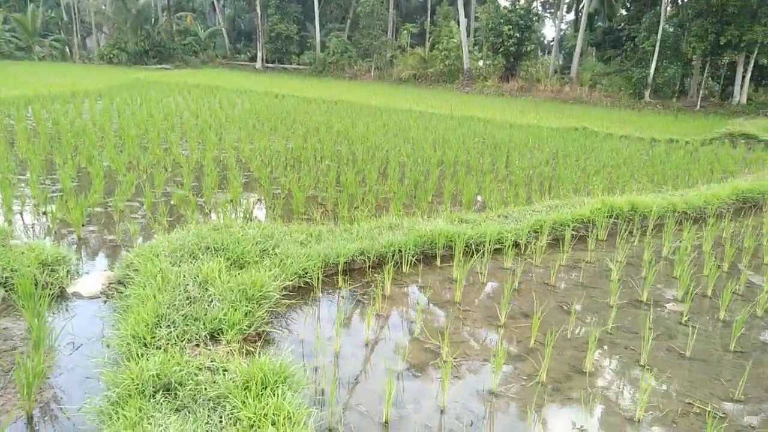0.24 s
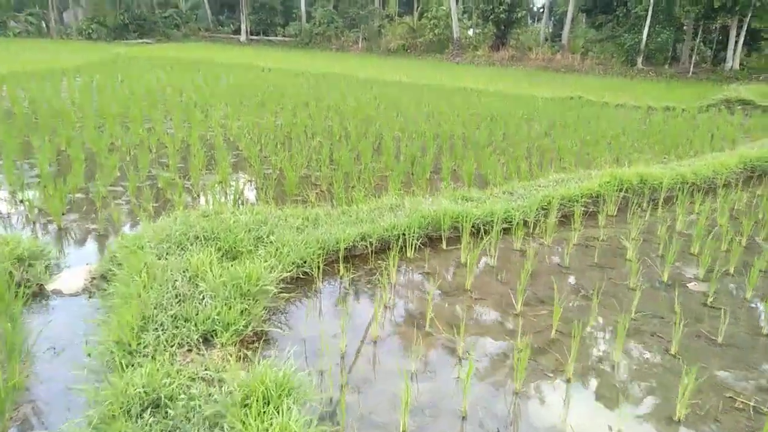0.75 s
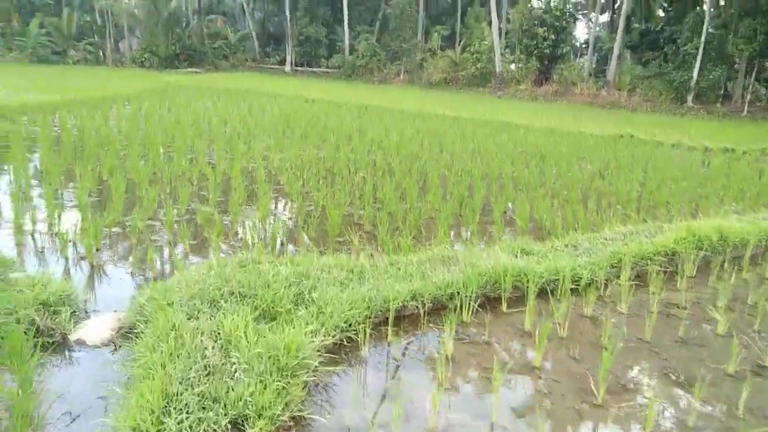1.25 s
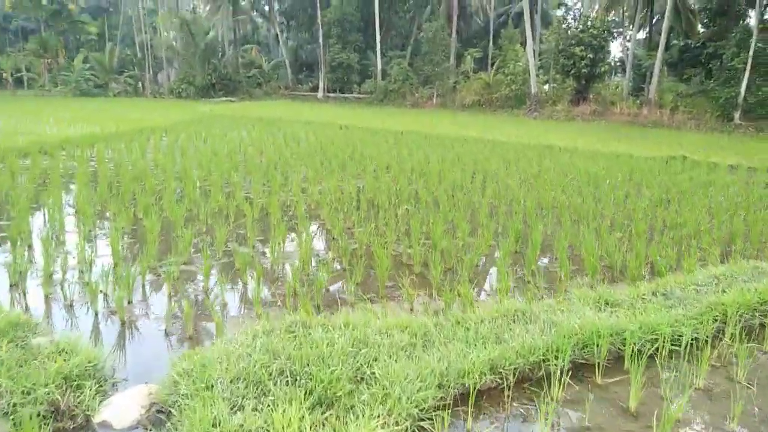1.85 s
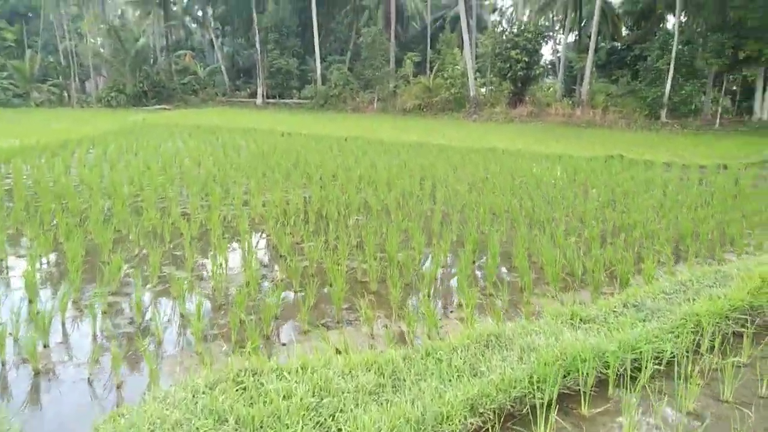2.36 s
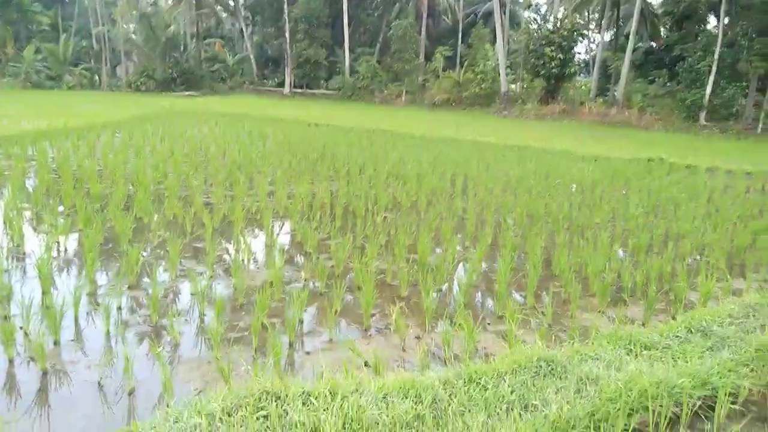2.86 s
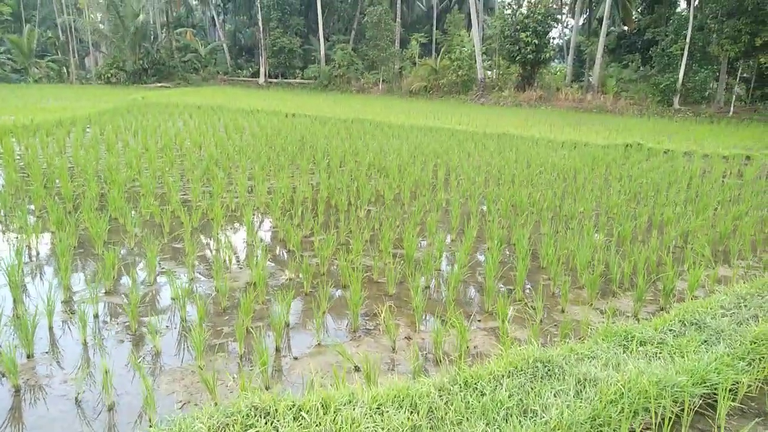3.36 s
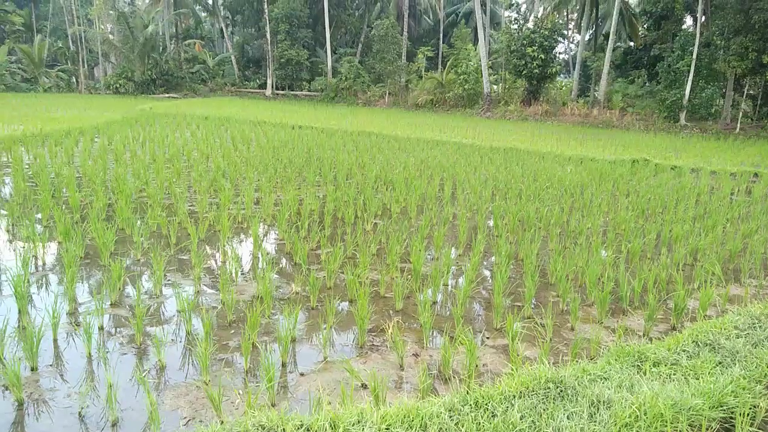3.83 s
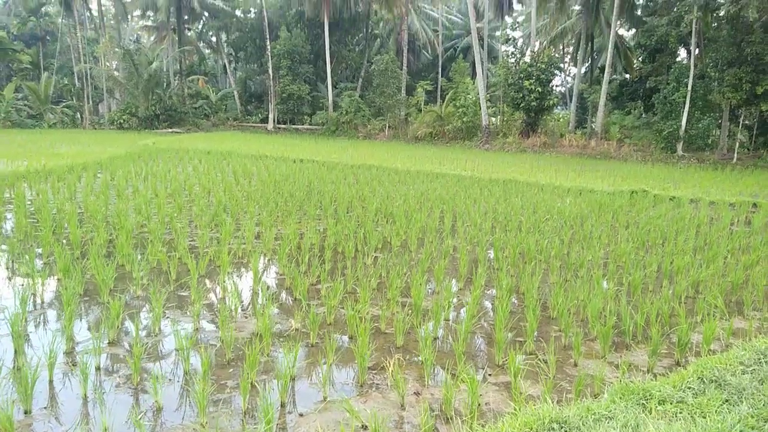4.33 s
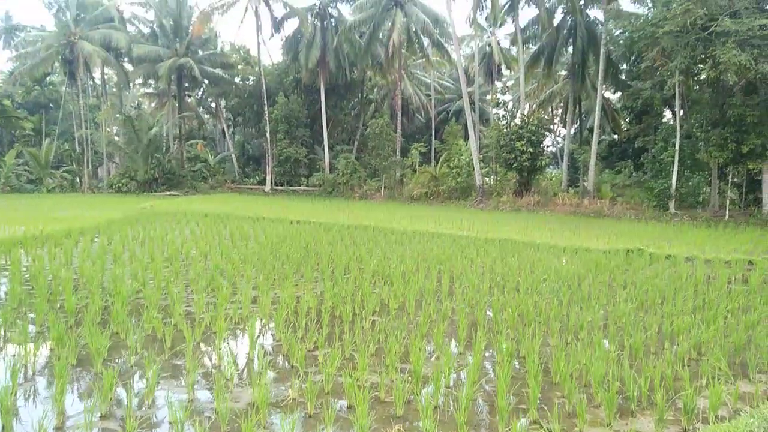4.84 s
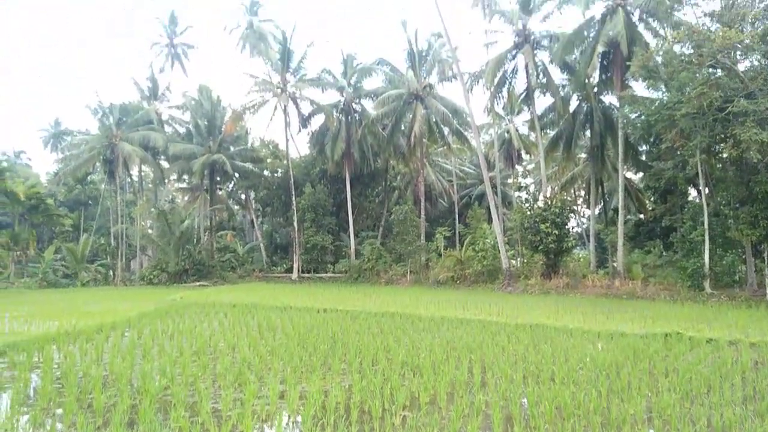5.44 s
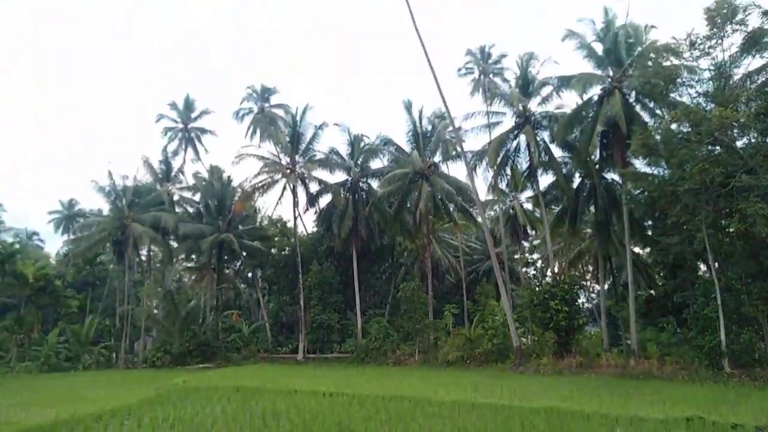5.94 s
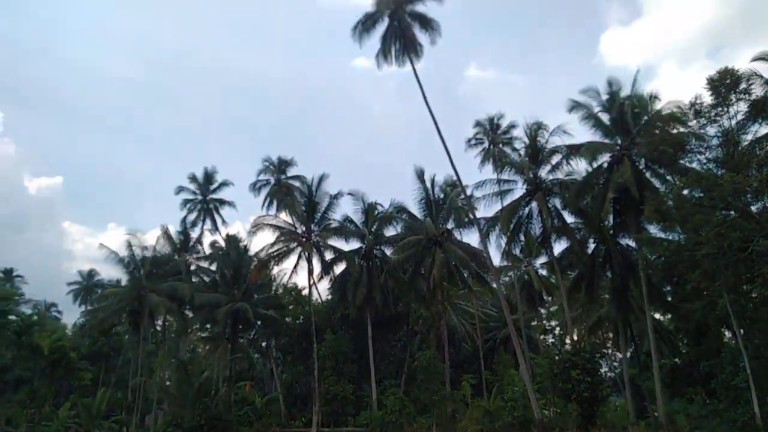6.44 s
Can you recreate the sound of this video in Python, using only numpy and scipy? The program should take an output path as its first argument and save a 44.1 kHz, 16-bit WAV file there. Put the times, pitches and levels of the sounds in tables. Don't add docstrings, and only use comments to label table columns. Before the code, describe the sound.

Handheld outdoor ambience in open wet paddies: airy hiss, lumpy low wind and step thumps on the microphone. Bright whistled peeps drop quickly in pitch, sometimes in overlapping pairs. Early grass strides hiss and crackle, ending with a splash and a cluster of housing knocks near three seconds. Then it is calmer, with a small engine throbbing in swells, far clucks and coos, and a thin insect whine late.

```python
import sys
import numpy as np
from scipy import signal
from scipy.fft import rfft, irfft, next_fast_len
from scipy.io import wavfile
from scipy.ndimage import uniform_filter1d

SR = 44100
rng = np.random.default_rng(int(sys.argv[2]) if len(sys.argv) > 2 else 0)


def wav_out(sig):
    wavfile.write(sys.argv[1], SR, np.round(np.clip(np.atleast_2d(sig).T, -1, 1) * 32767).astype(np.int16))


def how_loud(loudness_db):
    steps = np.asarray(loudness_db, float) / 20
    return 10 ** steps


N = 295029
LEAD = 8192

# frequency in Hz, density in dB per Hz.
AIR_SPECTRUM = [(180, -52), (300, -11.5), (360, -9), (590, -12), (708, -10.5), (1030, -16.5), (1900, -19),
                (2970, -22), (4960, -24), (5940, -24.5), (12100, -26), (15500, -21.5)]
# frequency in Hz, t60 in seconds.
NEAR_T60 = [(500, .35), (3300, .29), (4200, .32), (5000, .33), (7000, .3)]
# frequency in Hz, level in dB.
TREE_LINE_BAND = [(3500, -40), (4700, -20), (4950, 0), (5150, -1), (5450, -20), (7000, -34)]

# time in seconds, pitch in Hz, level in dB.
ROAD_WHINE = [
    (0.0, 363, -61),
    (0.253, 360.6, -64),
    (0.672, 396.6, -73.5),
    (0.92, 386, -81),
]
# start in seconds, length in seconds, level in dB.
INSECT_PHRASES = [(4.87, .06, -83), (4.99, .06, -92), (5.153, 0.26, -88.5), (5.405, 0.034, -82),
                  (5.53, 0.12, -93), (5.698, .06, -83), (5.88, .08, -94.5), (6.034, 0.17, -85),
                  (6.207, .14, -79.5), (6.424, 0.12, -81), (6.557, .11, -85)]
# start in seconds, swell in seconds, level in dB.
INSECT_BED = (4.9, 0.34, -91.5)

# time in seconds, firing rate in Hz.
FIRING_RATE = [(0, 28.5), (1.4, 27), (2, 29), (3, 29.5), (3.5, 28.5), (3.9, 27), (4.8, 27), (5.07, 28.5),
               (5.36, 28.6), (5.45, 29.5), (6.07, 29.6), (6.32, 30.3), (6.43, 28.8), (6.69, 25.9)]
# time in seconds, level in dB,
# order favoured by direct sound plus ground echo.
ENGINE_PATH = [(0.0, -63, 4.0), (.8, -76.5, 4.8), (1.2, -60.5, 4.4), (1.51, -61, 4.45), (2.38, -50, 4.55),
               (2.55, -50.5, 4.25), (2.91, -47.5, 4.75), (3.58, -55, 4.3), (3.9, -48.5, 4.65),
               (4.3, -55, 4.65), (4.78, -58.5, 4.9), (4.95, -49, 5.0), (5.27, -43.5, 5.05),
               (5.66, -52, 5.0), (5.85, -46, 4.2), (6.12, -39.5, 4.9), (6.3, -46, 5.7), (6.47, -39, 4.3),
               (6.69, -46, 4.4)]
# order number, level in dB against its leader.
EXHAUST_ORDERS = [(2, -10.5), (3, -14.5), (7, 1.5), (8, -3.5), (9, -1.5), (10, -4), (11, -21.5),
                  (12, -15.5)]
# time in seconds, rise in seconds, fall in seconds, level in dB.
LOAD_BARKS = [
    (2.55, 0.11, 0.089, -58.5),
    (2.91, 0.056, 0.31, -65),
    (6.12, 0.044, 0.069, -60),
    (6.32, 0.13, 0.081, -57),
    (5.42, 0.069, 0.17, -69),
    (6.69, 0.08, .1, -58),
]

# start in seconds, length in seconds, pitch in Hz, level in dB.
FOWL_NOTES = [(0, 0.064, 817, -70), (.33, 0.13, 731, -64.5), (.52, 0.13, 728, -67), (.385, 0.16, 861, -71),
              (.56, 0.13, 918, -69.5), (.17, 0.029, 968, -72), (.74, 0.038, 1000, -80),
              (.86, 0.049, 879, -69.5), (.934, 0.089, 742, -76), (1.046, 0.064, 928, -76.5),
              (1.15, 0.1, 733, -66), (1.39, .063, 747, -70.5), (1.47, 0.067, 853, -64),
              (1.64, 0.095, 879, -72), (1.87, 0.073, 855.4, -64.5), (1.92, 0.11, 1046, -75.5),
              (2.05, 0.31, 845, -72), (2.4, 0.31, 834, -73.5), (3.23, 0.086, 793, -68),
              (3.46, 0.1, 789, -73), (3.6, 0.34, 773, -66), (3.75, 0.16, 655, -69),
              (4.22, 0.052, 756, -70.5), (4.4, 0.064, 753, -73.5), (4.67, 0.051, 738, -74.5),
              (4.95, 0.031, 884, -67), (5.553, 0.078, 940, -79), (5.69, 0.044, 738, -73)]
# start in seconds, length in seconds, pitch in Hz, level in dB.
DOVE_NOTES = [(.1, 0.076, 607, -80), (1.0, 0.062, 480, -73), (1.7, 0.12, 517, -74),
              (1.38, 0.045, 443, -73.5), (2.18, 0.081, 604, -68), (3.3, 0.33, 565.4, -73.5),
              (4.0, 0.074, 520, -74), (4.28, 0.19, 521, -73), (4.571, 0.059, 435, -68.5),
              (4.59, 0.21, 514, -73), (4.9, 0.065, 509, -76), (5.33, 0.11, 520, -71.5),
              (5.75, 0.11, 505, -66.5)]
# start in seconds, length in seconds, pitch in Hz, level in dB.
CROW_NOTES = [(.36, 0.28, 1456, -70.5), (.68, 0.082, 1424, -73.5), (.88, 0.056, 1614, -68),
              (1.47, 0.115, 1738, -70.5), (1.68, 0.099, 1478, -73), (2.11, 0.042, 1520, -84),
              (2.18, 0.037, 1600, -75), (.02, 0.042, 1620, -82), (.58, 0.17, 1450, -81),
              (.76, .04, 1800, -87), (1.245, 0.03, 2080, -81), (2.16, 0.03, 1200, -81),
              (2.261, 0.044, 1323, -73), (3.0, 0.16, 1584, -71), (3.08, 0.14, 1350, -80.5),
              (3.23, 0.22, 1566, -78), (3.269, 0.036, 1363, -79), (3.595, 0.046, 1407, -69),
              (3.6, 0.41, 1537, -78), (4.09, 0.055, 1520, -78.5)]
# start in seconds, length in seconds, pitch in Hz, level in dB.
SMALL_BIRD_NOTES = [
    (1.845, 0.025, 1210, -68),
    (2.1, 0.05, 2100, -77.5),
    (1.19, .02, 2400, -82),
    (4.742, 0.067, 2800, -77.5),
    (4.77, 0.049, 2450, -73),
    (5.55, 0.13, 2120, -68),
    (6.459, .014, 2640, -73.5),
    (6.195, 0.03, 6750, -83),
]

# frequency in Hz, density in dB per Hz.
RUMBLE_SPECTRUM = [(12, -30.5), (30, 4.5), (70, 3.5), (130, 5.5), (200, -18), (400, -38)]
# frequency in Hz, density in dB per Hz.
FLUTTER_SPECTRUM = [(120, -27), (200, 11.5), (330, 5.5), (500, -32), (1100, -27), (2500, -42)]
# time in seconds, reach in seconds,
# rumble in dB, flutter in dB against it.
GUSTS = [(.18, 0.19, -54, -16), (.61, 0.1, -60.5, -17), (1.3, 0.24, -53.5, -9), (1.541, 0.1, -46, -13.5),
         (1.92, 0.32, -49, -11), (2.118, 0.12, -55, -2), (2.29, 0.15, -47, -12.5),
         (2.532, 0.12, -44.5, -3.5), (2.96, 0.26, -44.5, -6), (3.35, 0.043, -50, -40),
         (3.95, 0.32, -48.5, -20), (4.169, 0.11, -60.5, 11.5), (4.418, 0.058, -54.5, 0),
         (4.571, 0.16, -52, -15), (4.922, 0.062, -45.5, -12.5), (5.27, 0.18, -50, -10.5),
         (6.2, 0.47, -57, -2), (6.69, 0.13, -45.5, -26)]
# time in seconds, peak in dB, pitch
# in Hz, reach in seconds.
PUFFS = [
    (1.272, -38, 79.3, 0.017),
    (1.547, -36, 92.8, 0.024),
    (1.93, -37, 85, 0.029),
    (2.028, -38, 110, 0.031),
    (2.511, -37, 113, .012),
    (2.532, -26.5, 108, 0.0092),
    (2.9383, -31, 266, 0.0018),
]

# time in seconds, peak in dB, ring in Hz, t60 in seconds.
HOUSING_KNOCKS = [
    (2.101, -57, 111, 0.11),
    (2.8135, -39.5, 463, 0.036),
    (2.8243, -24.5, 600, 0.0058),
    (2.9375, -16.5, 285, 0.0092),
    (2.942, -26, 129, 0.032),
    (0.942, -51, 251, 0.1),
    (2.974, -33.5, 148, 0.05),
]
# time in seconds, level in dB.
HAND_SCRAPE = [
    (2.805, -84),
    (2.828, -52.5),
    (2.87, -53.5),
    (2.92, -64.5),
    (2.95, -54),
    (3.04, -58),
    (3.1, -89),
]
# frequency in Hz, density in dB per Hz.
SCRAPE_SPECTRUM = [(200, -2), (400, 9), (1000, -2), (1600, -5), (3000, -16)]

# time in seconds, peak in dB, ring in Hz, length in cycles.
STEM_SNAPS = [(0.056, -46.5, 4700, 2.3), (.0615, -49.5, 9500, 2.3), (.3737, -52, 2700, 3.4),
              (0.78, -44, 4500, 1.4), (1.7995, -43, 2480, 1.2), (1.809, -46, 3100, 1),
              (2.5145, -39, 4960, 1.6), (2.526, -44, 4000, 1.3), (2.7174, -40, 9500, 0.9),
              (2.695, -42, 10700, 2.3), (2.9, -54, 11100, 2), (2.9, -52, 10000, 2), (1, -46, 10500, 2),
              (2.8232, -37.5, 2222, 0.94), (2.8233, -36, 8333, 1.1), (2.811, -47, 960, 1.6),
              (4.232, -66, 4000, .6), (2.2935, -56, 6400, 2.6), (2.9355, -29.5, 3500, 0.34),
              (2.976, -38, 5600, 2.5), (3.097, -41.5, 2720, 2.5)]
# time in seconds, rise in seconds, fall in seconds, level in dB.
SPLASHES = [
    (2.97, 0.024, 0.14, -53),
    (3.093, 0.07, 0.1, -65.5),
    (1.5, 0.032, 0.13, -66),
    (1.86, 0.052, 0.028, -69.5),
    (2.52, 0.018, 0.081, -55.5),
    (0.72, 0.037, .08, -78),
]
# frequency in Hz, density in dB per Hz.
SPRAY_SPECTRUM = [(1000, -24), (1600, -1.5), (2200, -2), (3500, 0), (4600, -16), (6000, -28)]
# time in seconds, rise in seconds, fall in seconds, # band centre in Hz, level in dB.
BLADE_DRAGS = [(1.432, 0.016, .045, 2700, -67.5), (1.395, 0.017, .04, 3150, -79),
               (2.6, .05, 0.057, 6650, -61.5), (2.6, 0.023, 0.047, 2900, -71),
               (3.12, 0.054, 0.061, 11000, -72), (2.3, 0.027, .05, 1940, -60.5), (7.1, 0.089, .1, 195, -55),
               (6.0, 0.23, 0.24, 213, -54.5), (1.89, 0.11, 0.094, 8100, -77),
               (1.7, 0.045, 0.037, 10150, -70), (2.28, 0.043, 0.037, 2300, -63.5),
               (2.31, 0.031, .04, 6100, -76), (0.666, .008, 0.078, 2220, -56),
               (0.62, 0.027, .05, 2420, -63.5), (2.53, 0.025, 0.026, 5800, -56.5),
               (2.75, .06, 0.078, 4500, -72), (1.036, .03, 0.05, 2340, -67),
               (0.37, 0.066, 0.091, 7700, -82), (0.43, 0.073, .1, 8420, -84),
               (1.41, 0.024, 0.044, 6100, -72), (0.38, .008, 0.047, 2480, -71),
               (.34, .03, 0.052, 6300, -84), (2.14, .025, 0.048, 4560, -58), (2.88, 0.08, .05, 4200, -76.5),
               (4.6, 0.087, 0.12, 190, -58.5), (4.8, .1, 0.078, 235, -63), (1.26, 0.1, 0.094, 340, -72),
               (1.73, .06, .06, 1270, -75), (6.19, 0.061, 0.037, 3800, -75), (2.87, 0.034, .05, 5200, -73),
               (2.95, 0.025, .06, 1130, -63), (2.77, .05, 0.038, 3100, -81)]

# time in seconds, rise in seconds, fall in seconds, stroke in dB,
# wet stems in dB against the stroke.
STRIDES = [(.64, 0.031, 0.22, -68.5, -7), (0.779, 0.14, 0.23, -58, 1), (.92, 0.11, 0.068, -60.5, -2),
           (1.5, 0.046, 0.22, -56, -4.5), (1.73, 0.066, 0.092, -58, 0.5), (1.86, 0.051, 0.038, -65.5, -4),
           (2.29, 0.02, 0.026, -77, 13), (2.409, 0.074, 0.11, -60.5, 4), (2.58, 0.21, 0.12, -64.5, 0.5),
           (3.002, 0.062, 0.14, -57, -3)]
# time in seconds, rise in seconds, fall in seconds, level in dB.
TIP_BRUSHES = [
    (0.064, .01, 0.074, -76),
    (0.376, 0.049, 0.067, -73),
    (0.54, 0.015, 0.1, -74.5),
    (2.53, 0.13, 0.2, -67.5),
    (1.49, 0.029, 0.075, -68),
    (2, .04, 0.05, -83),
    (0.91, .08, 0.045, -68),
    (2.4, 0.042, 0.071, -68),
    (2.92, 0.039, 0.15, -59.5),
    (2.85, 0.025, .05, -70),
]
# frequency in Hz, density in dB per Hz.
BLADE_SPECTRUM = [(3000, -46), (3900, -1.5), (5800, 4.5), (7300, -3), (8500, -11.5), (10000, -33)]
# frequency in Hz, density in dB per Hz.
STEM_SPECTRUM = [(900, -27.5), (1950, -11), (2250, 5), (3200, -1), (4200, -5), (5500, -37)]
# frequency in Hz, density in dB per Hz.
TIP_SPECTRUM = [(7500, -30), (9000, -3), (11000, 0), (13500, -8), (15000, -22)]

# frequency in Hz, level in dB.
BEAK_RESPONSE = [(3000, -27.5), (3500, -17.5), (4100, -10), (4900, -1.5), (5400, -10.5), (6500, -4)]
# start in seconds, length in seconds, top in Hz, end in Hz, level in dB.
FALLING_PEEPS = [(-.13, 0.06, 5370, 3550, -43.5), (.295, 0.125, 5240, 3530, -50),
                 (0.407, 0.086, 5040, 3340, -53), (0.878, 0.1, 5180, 3505, -49.5),
                 (1.498, 0.071, 5000, 3510, -49), (1.971, 0.097, 5190, 3560, -49),
                 (3.065, 0.11, 5390, 3410, -47), (3.649, .11, 5320, 3390, -48),
                 (3.719, 0.098, 5170, 3300, -54), (4.267, .125, 5430, 3200, -47),
                 (4.845, 0.11, 5350, 3374, -46), (5.973, 0.11, 5310, 3360, -48.5),
                 (6.514, 0.12, 5193, 3343, -51), (6.629, 0.09, 5060, 3300, -54.5)]
# start in seconds, length in seconds, start in Hz,
# top in Hz, level in dB.
ARCHED_PEEPS = [
    (0.995, 0.06, 4300, 4966, -50),
    (2.044, 0.08, 4000, 4890, -50),
    (3.142, 0.078, 4370, 5243, -50),
    (4.932, .082, 4320, 5213, -51),
    (6.065, 0.079, 4796, 5190, -52),
]
# start in seconds, length in seconds, start in Hz,
# top in Hz, end in Hz, level in dB.
SWOOPING_PEEPS = [
    (2.561, .116, 3600, 5020, 3700, -49.5),
    (5.512, .122, 3700, 5160, 2980, -50.5),
]
# start in seconds, length in seconds, start in Hz, top in Hz,
# end in Hz, level in dB.
WARBLES = [
    (3.642, .14, 5600, 6380, 6150, -63),
]
# start in seconds, level in dB.
BEAK_TICKS = [
    (1.956, -52.5),
    (4.842, -53),
    (5.96, -67),
]


def evened(x):
    return x / np.sqrt(np.mean(x ** 2) + 1e-20)


def read(points, hz):
    f, value = np.transpose(points)
    return np.interp(np.log(hz + 1), np.log(f + 1), value)


def curves(rows):
    s, *columns = np.transpose(rows)
    return [np.interp(np.arange(N) / SR, s, column) for column in columns]


def add(mix, s, sound):
    part = mix[round(s * SR):][:len(sound)]
    part += sound[:len(part)]


def wander(size, span):
    return evened(uniform_filter1d(uniform_filter1d(rng.standard_normal(size), span), span))


def bumps(rows, lead_s=0.):
    t = np.arange(N) / SR + lead_s
    power = 0
    for s, rise_s, fall_s, db in rows:
        reach_s = np.where(t < s, rise_s + 0.004, fall_s + 0.005)
        power = power + how_loud(2 * db - 20 * (abs(t - s) / reach_s) ** 1.79)
    return np.sqrt(power)


def noise(spectrum, size=512, patchy_db=1.5):
    frames, hz = 4 * N // size + 5, np.fft.rfftfreq(size, 1 / SR)
    a, b, patches = rng.standard_normal((frames, len(hz), 3)).T
    patches = uniform_filter1d(patches, size=4, axis=0)
    patches = evened(uniform_filter1d(patches, size=18, axis=1))
    closed = [(spectrum[0][0] / 2, -90), *spectrum, (spectrum[-1][0] * 2, -90)]
    db = read(closed, hz)[:, None] + patchy_db * patches
    return evened(signal.istft((a + 1j * b) * how_loud(db), nperseg=size, noverlap=3 * size // 4)[1][:N])


def trees(x):
    line_db, line_s, line_t60_s = -11.5, .15, .55
    taps = np.zeros(SR)
    at = np.arange(100, SR - 20, 20)
    taps[at + rng.integers(0, 20, len(at))] = rng.choice([-1., 1.], len(at))
    hz, t, z = signal.stft(taps, SR, nperseg=256)
    near = how_loud(-60 * t / read(NEAR_T60, hz)[:, None]) + how_loud(-6.5 - 60 * t / .07)
    late_db = line_db + read(TREE_LINE_BAND, hz)[:, None] - 60 * (t - line_s) / line_t60_s
    late = how_loud(late_db) * np.clip((t - line_s) / 0.12 + 1, 0, 1)
    tail = signal.istft(z * np.hypot(near, late), SR, nperseg=256)[1] / 12
    return signal.fftconvolve(x, tail)[:len(x)]


def air():
    return how_loud(-75.5 + .6) * noise(AIR_SPECTRUM, size=1024, patchy_db=.8)


def road_whine():
    end_s, end_hz, _ = ROAD_WHINE[-1]
    hz, db = curves([*ROAD_WHINE, (end_s + 0.094, end_hz, -120)])
    level = np.sqrt(2) * how_loud(db - 6.5 + 5.9 * wander(N, 1500))
    return level * np.sin(2 * np.pi * np.cumsum(hz) / SR)


def insect():
    start_s, swell_s, bed_db = INSECT_BED
    level = how_loud(bed_db) * np.clip((np.arange(N) / SR - start_s) / swell_s, 0, 1)
    for s, length_s, db in INSECT_PHRASES:
        add(level, s, how_loud(db) * signal.windows.tukey(int(length_s * SR), .5))
    band = noise([(7500, -51), (7700, 20.0), (7850, 5), (7950, 2), (8100, -18)], size=1024)
    return level * how_loud(2.5 * wander(N, 600)) * band


def engine():
    notch_db, tilt_db_per_order, idle_bark_db = 10, -4, -36
    (hz,), (level_db, favoured) = curves(FIRING_RATE), curves(ENGINE_PATH)
    turn = 2 * np.pi * np.cumsum(hz * (1 + 0.003 * wander(N, 2500))) / SR
    lead = {}
    for k in (4, 5, 6):
        notch = notch_db * np.sin(np.pi / 2 * (k - favoured)) ** 2
        lead[k] = how_loud(level_db + tilt_db_per_order * (k - 4) - notch)
    bark = bumps(LOAD_BARKS) + how_loud(level_db + idle_bark_db)
    orders = list(lead.items())
    orders += [(k, how_loud(db) * (lead[4] if k < 4 else bark)) for k, db in EXHAUST_ORDERS]
    out = np.zeros(N)
    for k, gain in orders:
        out += np.sqrt(2) * gain * how_loud(3.2 * wander(N, 2500)) * np.cos(k * turn + 0.32 * k)
    return out


def hoarse_notes(notes, slide_octaves_per_s, octave_db):
    out = np.zeros(N)
    for s, length_s, hz, db in notes:
        n = int(length_s * SR)
        slide = slide_octaves_per_s * length_s * np.linspace(-.5, .5, n)
        waver = .034 * wander(3 * LEAD, 1500)[:n]
        turn = 2 * np.pi * np.cumsum(hz * 2 ** (slide + waver)) / SR
        blur = [1 + 1.1 * (wander(3 * LEAD, 500) + 1j * wander(3 * LEAD, 500))[:n] for _ in range(2)]
        tone = blur[0] * np.exp(1j * turn) + how_loud(octave_db) * blur[1] * np.exp(2j * turn)
        add(out, s, how_loud(db) * signal.windows.tukey(n, .5) * tone.imag)
    return out


def far_calls():
    large = hoarse_notes(FOWL_NOTES, -0.004, -28.5)
    large += hoarse_notes(DOVE_NOTES, -0.0083, -26.5)
    large += hoarse_notes(CROW_NOTES, -0.041, -40)
    small = hoarse_notes(SMALL_BIRD_NOTES, -1.73, -30)
    return large + small + how_loud(2.5) * trees(large + how_loud(-6) * small)


def wind():
    calm_db, calm_flutter_db = -74.5, -78
    low = how_loud(calm_db) + bumps([(s, reach, reach, db) for s, reach, db, _ in GUSTS])
    high = how_loud(calm_flutter_db) + bumps([(s, reach, reach, db + up_db) for s, reach, db, up_db in GUSTS])
    rumble = noise(RUMBLE_SPECTRUM, size=2048, patchy_db=1.0) * how_loud(3.5 * wander(N, 900))
    flutter = noise(FLUTTER_SPECTRUM, size=1024, patchy_db=5.5) * how_loud(2 * wander(N, 500))
    return low * rumble + how_loud(-5) * high * flutter


def puffs():
    t = np.arange(N) / SR
    out = np.zeros(N)
    for s, db, hz, reach_s in PUFFS:
        out += how_loud(db) * np.exp(-((t - s) / reach_s) ** 2) * np.sin(2 * np.pi * hz * (t - s))
    return out


def knocks():
    out, t = np.zeros(N), np.arange(16000) / SR
    for s, db, hz, t60_s in HOUSING_KNOCKS:
        fade = how_loud(db - 60 * t / np.clip(t60_s, .01, .18)) * np.tanh(t * hz * 12)
        add(out, s, -fade * np.sin(2 * np.pi * hz * t))
    db, = curves([(0, -130), *HAND_SCRAPE, (HAND_SCRAPE[-1][0] + .02, -130)])
    return out + how_loud(db + 2.7 * wander(N, 120)) * noise(SCRAPE_SPECTRUM, size=256)


def snaps():
    out, t = np.zeros(N), np.arange(-60, 200) / SR
    for s, db, hz, cycles in STEM_SNAPS:
        width_s = np.where(t < 0, .4, 1) * np.clip(cycles, .2, 3) / hz
        add(out, s, how_loud(db) * np.exp(-(t / width_s) ** 2) * np.sin(2 * np.pi * hz * t))
    return out + how_loud(-14) * trees(out)


def splashes():
    return bumps(SPLASHES) * noise(SPRAY_SPECTRUM, size=512, patchy_db=7)


def blade_drags():
    size = next_fast_len(N)
    hiss, hz = rfft(rng.standard_normal(size)), np.fft.rfftfreq(size, 1 / SR)
    out = np.zeros(N)
    for s, rise_s, fall_s, centre_hz, db in BLADE_DRAGS:
        width = .06
        band = irfft(hiss * np.exp(-((hz / centre_hz - 1) / width) ** 2), size)[:N]
        out += bumps([(s, rise_s, fall_s, db)]) * evened(band)
    return out


def grass():
    catches = how_loud(3 * np.minimum(rng.exponential(1, N), 2.5)) * (rng.random(N) < 120 / SR)
    prickle = 1 + .15 * uniform_filter1d(catches, 30) * 30
    blades, stems, tips = [noise(part, size=1024, patchy_db=3) * prickle
                           for part in (BLADE_SPECTRUM, STEM_SPECTRUM, TIP_SPECTRUM)]
    strokes = bumps([row[:4] for row in STRIDES]) * how_loud(1.5 * wander(N, 700))
    wet_rows = [(s, rise, fall, db + stems_db) for s, rise, fall, db, stems_db in STRIDES]
    wet = bumps(wet_rows, lead_s=0.0067)
    brush = np.hypot(how_loud(-11) * strokes, bumps(TIP_BRUSHES))
    return how_loud(4) * strokes * blades + how_loud(2.5) * wet * stems + brush * tips


def peep(length_s, start_hz, top_hz, end_hz, db, rise, bend, hold=0):
    u = np.linspace(0, 1, max(int(length_s * SR), 9))
    up = np.sin(np.pi / 2 * np.clip(u / rise, 0, 1))
    down = np.sin(np.pi / 2 * np.clip((u - rise) / (1 - rise - hold), 0, 1) ** bend) ** 2
    hz = start_hz + (top_hz - start_hz) * up - (top_hz - end_hz) * down
    beads = 1 + .6 * (wander(LEAD, 130) + 1j * wander(LEAD, 150))[:len(u)]
    swell = np.clip(u / 0.13, 0, 1) ** 0.69 * np.clip((1 - u) / 0.036, 0, 1)
    tone = (beads * np.exp(2j * np.pi * np.cumsum(hz) / SR)).imag
    return how_loud(db + read(BEAK_RESPONSE, hz)) * swell * tone


def chicks():
    out = np.zeros(N + LEAD)
    lead_s = LEAD / SR
    for s, length_s, top_hz, end_hz, db in FALLING_PEEPS:
        add(out, s + lead_s, peep(length_s, 4500, top_hz, end_hz, db, rise=0.1288, bend=0.97, hold=.13))
    for s, length_s, start_hz, top_hz, db in ARCHED_PEEPS:
        add(out, s + lead_s, peep(length_s, start_hz, top_hz, top_hz - 793, db, rise=.62, bend=2.31))
    for s, *row in SWOOPING_PEEPS:
        add(out, s + lead_s, peep(*row, rise=.3, bend=.85))
    for s, db in BEAK_TICKS:
        add(out, s + lead_s, peep(.011, 5480, 5600, 5600, db, rise=0.56, bend=1.9))
    for s, *row in WARBLES:
        add(out, s + lead_s, peep(*row, rise=.6, bend=1.9))
    return (out + how_loud(2.2) * trees(out))[LEAD:]


def scene():
    mix = air()
    mix = mix + chicks() + far_calls() + engine() + road_whine()
    mix = mix + wind() + grass() + snaps() + knocks()
    mix = mix + insect() + splashes() + blade_drags() + puffs()
    return mix[None]


def thinned(x):
    hz, _, z = signal.stft(x, SR, nperseg=512)
    top = hz > 12800
    specks = uniform_filter1d(abs(z[0, top]) ** 2, size=2, axis=0)
    specks = uniform_filter1d(specks, size=3, axis=1)
    margin = how_loud(2 * 1.2 * wander(z.shape[2], 9))
    kept = z * 1
    kept[0, top] *= specks > margin * np.median(specks, axis=1, keepdims=True)
    return signal.istft(kept, SR, nperseg=512)[1][:, :N]


def top_cut(x):
    return signal.sosfilt(signal.butter(12, 15720, fs=SR, output="sos"), x)


def record(dry):
    top_edge = signal.cheby2(12, 50, 16300, fs=SR, output="sos")
    bass_cut = signal.butter(1, 22, "high", fs=SR, output="sos")
    edged = signal.sosfiltfilt(top_edge, thinned(dry))
    mix = signal.sosfilt(bass_cut, edged)
    return top_cut(mix)


dry = scene()
out = record(dry)
wav_out(out)
```